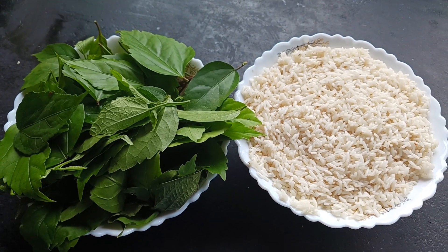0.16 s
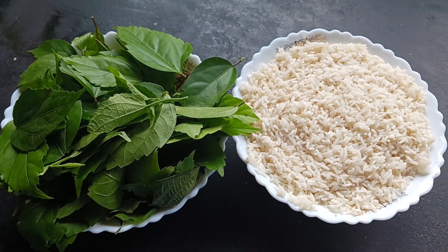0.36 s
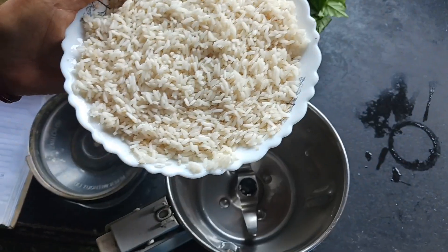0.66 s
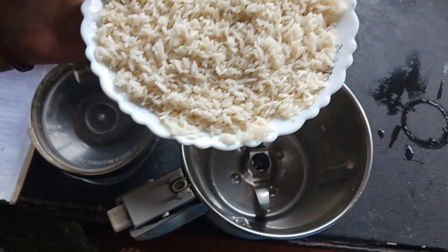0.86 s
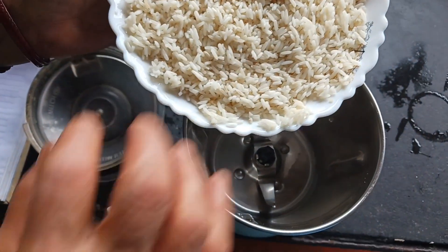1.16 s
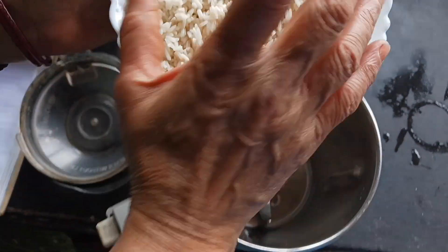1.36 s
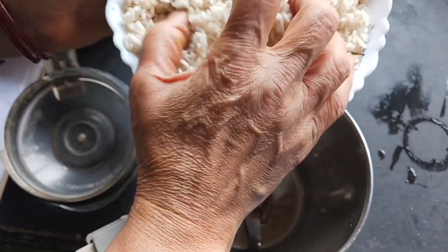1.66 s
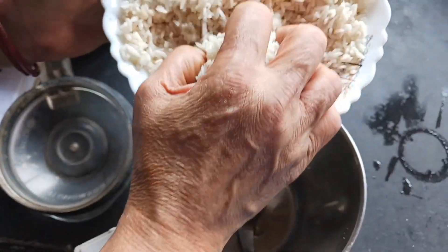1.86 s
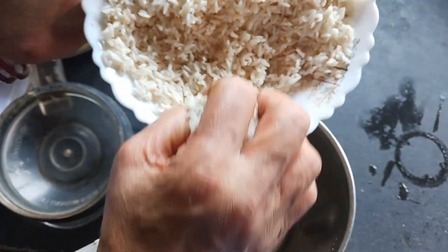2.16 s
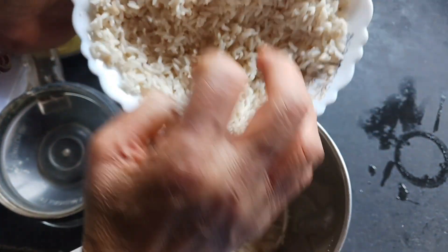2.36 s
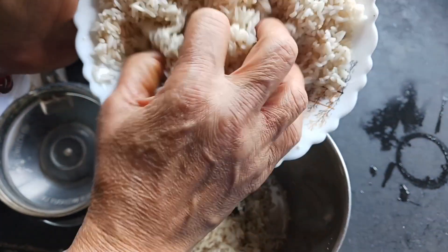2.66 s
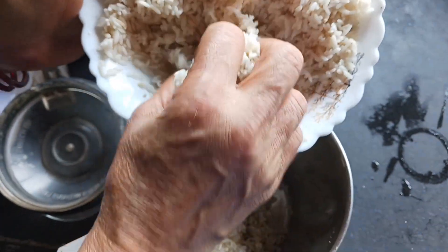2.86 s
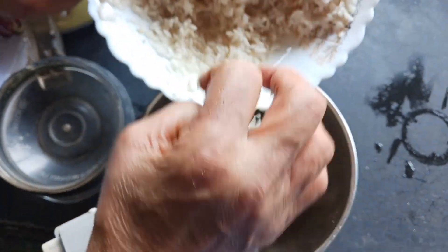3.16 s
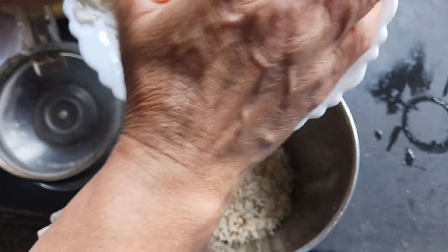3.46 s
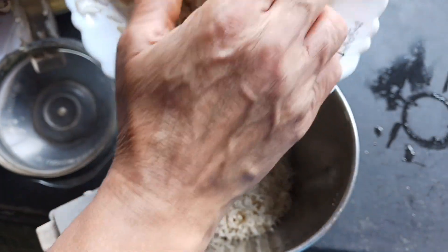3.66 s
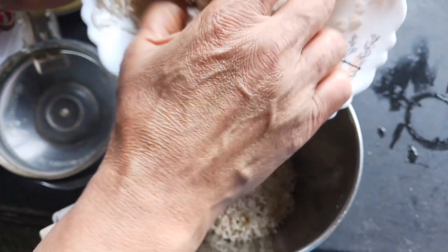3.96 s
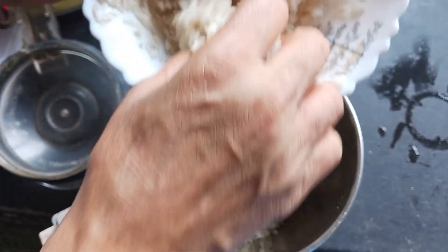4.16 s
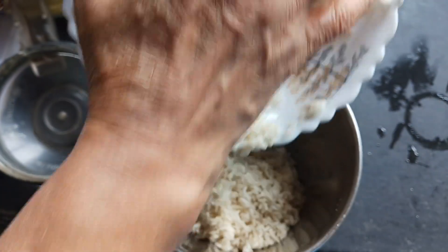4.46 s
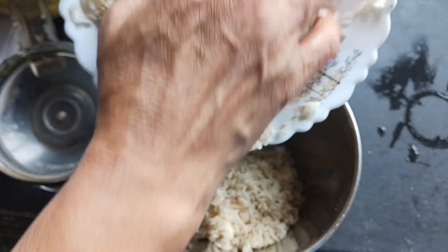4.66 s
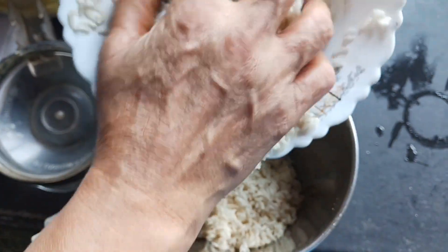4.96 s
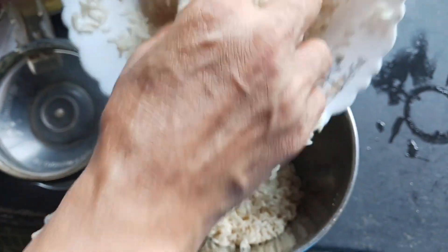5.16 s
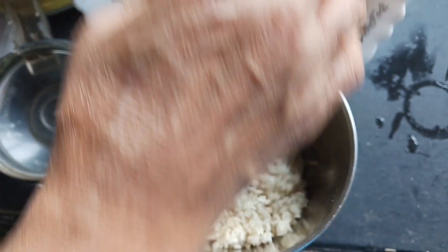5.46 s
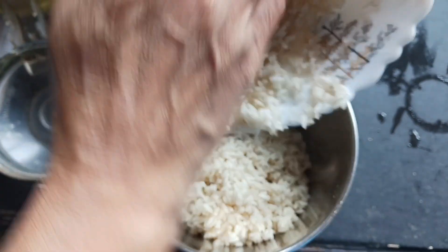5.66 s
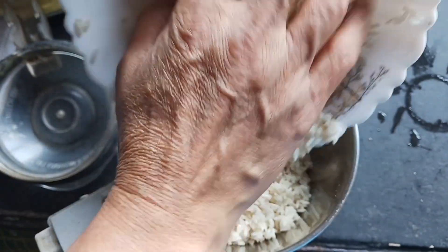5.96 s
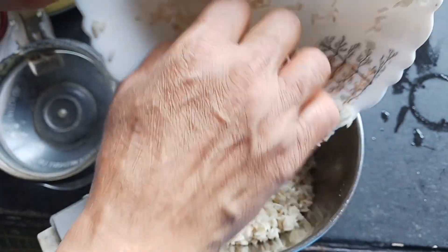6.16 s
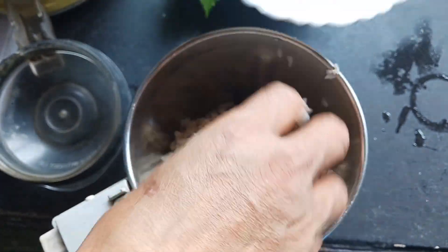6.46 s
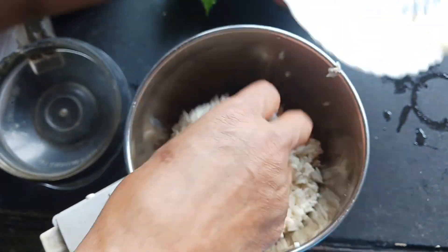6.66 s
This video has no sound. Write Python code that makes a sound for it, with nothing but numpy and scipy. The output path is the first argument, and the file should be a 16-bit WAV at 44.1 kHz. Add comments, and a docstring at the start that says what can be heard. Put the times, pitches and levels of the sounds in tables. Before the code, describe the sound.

A close stereo view of a small, quiet kitchen with a faint steady hush. A lone grain ticks at the start; at 0.5-0.9 s a heap of soaked rice glides on a plate in a smooth swish. A light knock of plate on steel rim comes at 1.6 s. From 2.1 to 2.5 s the first rice spills, crackling wetly, clumps pattering into the hollow jar. A soft knock at 2.6 s, then a brief finger rub and a stronger hissing, slightly whistling spill at 3.1-3.4 s with one loud clump landing. Harder short clanks follow at 3.7, 4.0, 4.6 and 5.1 s, between raking strokes, juddering fingertips and spills near 4.3 and 5.4 s. Tiny high bangle pings appear from 4.6 s. A last rim knock with small rebounds at 6.3 s gives way to soft stirring, ticks and clumps until 6.8 s.

```python
"""Soaked rice is raked by hand off a glass plate into a steel grinder jar, close by in a small kitchen.
Over a steady hush the heap first glides as smooth noise; filtered bursts make single grains tick.
The plate then knocks on the jar's rim, as decaying noise and damped modes, and clumps land as short showers.
Random contacts through filters and resonances make the rice spill into the jar and hiss under the raking hand.
Fingers judder over the plate between strokes, and later bangles ping as close pairs of sines."""
import sys
import numpy as np
from scipy import signal
from scipy.fft import rfft, irfft, next_fast_len
from scipy.io import wavfile

SR = 44100
rng = np.random.default_rng(int(sys.argv[2]) if len(sys.argv) > 2 else 0)


def bounce(signal):
    """Save signal as a 16-bit WAV file at the path given by the first command-line argument."""
    frames = np.transpose(np.atleast_2d(signal))
    limited = np.clip(frames, -1, 1)
    pcm = np.round(limited * 32767).astype(np.int16)
    wavfile.write(sys.argv[1], SR, pcm)


N = 299864
TIME = np.arange(N) / SR   # the whole scene, s
AGE = np.arange(int(.5 * SR)) / SR   # time since the onset of one event, s

# The plate's own note. Each row: frequency in Hz, level in dB, decay t60 in seconds.
PLATE_NOTE = [(1782, 0, .33)]
# Modes that ring after a knock, the lowest from the counter beneath: their frequencies in Hz.
MODE_HZ = [113, 310, 530, 645, 712, 1055, 1320, 1430, 1530, 1670, 2988, 3025, 3255, 3382, 3908, 4095, 4380,
           4763, 5865]
# Likeness of left and right. Each row: frequency in Hz, correlation.
LIKENESS = [(60, 0.79), (600, 0.74), (1200, -0.19), (2500, 0.12), (15000, 0.027)]
# Spectrum of grains sliding in a mass. Each row: frequency in Hz, relative density in dB per Hz.
SLIDE_SPECTRUM = [(100, -25), (450, -27), (1100, -29), (1700, -12.5), (2500, -7), (3400, 0.5), (4800, 0),
                  (6200, 1.5), (7400, -11.5), (10000, -12.5), (16000, -18.5)]
# Spectrum of wet crackle. Each row: frequency in Hz, relative density in dB per Hz.
CRACKLE_SPECTRUM = [(1500, -43.5), (4000, -14), (7500, -2.5), (10000, -4.5), (12500, 6), (14500, -0.5),
                    (16000, -7.5)]
# Spectrum of the dull rasp. Each row: frequency in Hz, relative level in dB.
RASP_SPECTRUM = [(120, -24), (400, -8.5), (580, -22), (950, -3.5), (1200, -4.5), (1600, -7.5), (2300, 4.5),
                 (3200, -6), (6000, -38)]
# Spectrum of clumps and lone grains. Each row: frequency in Hz, relative density in dB per Hz.
CLUMP_SPECTRUM = [(200, -24), (1200, -36), (2000, -39), (2700, -18), (4000, -1.5), (6000, -3.5),
                  (8500, -7.5), (12800, 1), (16000, 2)]


def from_db(db):
    """Level to gain: 20 dB is a factor of ten in amplitude."""
    return 10 ** (np.asarray(db) / 20)


def rms_one(x):
    """Normalisation: the mean square becomes one."""
    return x / np.sqrt(np.mean(x ** 2) + 1e-20)


def at_hz(points, hz):
    """Interpolation along a logarithmic frequency axis."""
    f, value = np.transpose(points)
    return np.interp(np.log(np.maximum(hz, 1)), np.log(np.maximum(f, 1)), value)


def colour(x, spectrum):
    """Linear filtering: the spectrum is multiplied by a smooth gain."""
    n = next_fast_len(x.shape[-1] + 512)
    gain = from_db(at_hz(spectrum, np.fft.rfftfreq(n, 1 / SR)))
    return irfft(rfft(x, n) * gain, n)[..., :x.shape[-1]]


def place(x, balance):
    """Directional radiation: each pitch has its own level difference, left minus right."""
    sides = []
    for channel, sign in zip(x, (1, -1)):
        sides.append(colour(channel, [(hz, sign * db / 2) for hz, db in balance]))
    return np.array(sides)


def noise(spectrum, size):
    """Partial coherence: mid and side noise are weighted to set the left-right correlation; rms 1."""
    n = next_fast_len(size)
    hz = np.fft.rfftfreq(n, 1 / SR)
    mid, side = rfft(rng.standard_normal((2, n))) * from_db(at_hz(spectrum, hz))
    alike = np.clip(at_hz(LIKENESS, hz), -1, 1)
    stereo = np.sqrt(1 + alike) * mid + np.sqrt(1 - alike) * side * [[1], [-1]]
    return rms_one(irfft(stereo, n)[:, :size])


def fade(t60, rise):
    """Damped response: a quick rise, then exponential decay by 60 dB in t60 seconds."""
    return (1 - np.exp(-AGE / rise)) * np.exp(-np.log(1000) * AGE / max(t60, 1e-3))


def add(out, s, sound):
    """Superposition: a sound is mixed in at time s."""
    i = max(round(s * SR), 0)
    out[:, i:i + sound.shape[-1]] += sound[..., :max(N - i, 0)]


def ring(modes):
    """Modal synthesis: one blow on damped modes, each with a left-right phase set by the correlation."""
    out = np.zeros((2, len(AGE)))
    for hz, db, t60 in modes:
        apart = np.arccos(np.clip(at_hz(LIKENESS, hz), -1, 1)) * rng.choice([-1, 1])
        phase = rng.uniform(0, 2 * np.pi) + np.array([[0], [apart]])
        out += from_db(db) * fade(t60, 1 / hz) * np.sin(2 * np.pi * hz * AGE + phase)
    return out


def resonate(x, hz, width):
    """Resonance: a two-pole band-pass with gain 1 near its top and a bandwidth in Hz."""
    r = np.exp(-np.pi * width / SR)
    numerator = np.array([1, 0, -1]) * (1 - r * r) / 2
    return signal.lfilter(numerator, [1, -2 * r * np.cos(2 * np.pi * hz / SR), r * r], x)


def wander(hz):
    """Random fluctuation: noise confined mostly below hz, with a spread of about 1."""
    fluctuation = colour(rng.standard_normal(N), [(hz, 0), (3 * hz, -40), (6 * hz, -90)])
    return np.clip(rms_one(fluctuation), -2.5, 2.5)


def grains(per_s, size_db, count=5):
    """Shot noise: random contacts of uneven size at several spots, each with its own wall reflections."""
    at = np.flatnonzero(rng.random(N) < per_s / SR)
    sizes = from_db(size_db * np.minimum(rng.exponential(1, len(at)), 4)) * rng.choice([-1, 1], len(at))
    clicks = np.zeros((count, N))
    # denser contacts are weaker, so that the mean power does not follow the rate
    clicks[rng.integers(0, count, len(at)), at] = sizes / np.sqrt(np.broadcast_to(per_s, N)[at])
    echo = rfft(rng.standard_normal((count, 2, 512)) * fade(.005, .00003)[:512])
    # a flat magnitude keeps the phases of the reflections but not their colour
    walls = np.roll(irfft(echo / np.abs(echo)), 40, axis=-1)[..., :400]
    spots = [signal.oaconvolve(spot[None], wall, axes=1)[:, :N] for spot, wall in zip(clicks, walls)]
    return rms_one(sum(spots))


def motion(rows, part=None):
    """Power addition: overlapping movements rise, hold and die away; part picks one of a row's shares."""
    t, power = TIME[::32], 0
    for start, rise, hold, t60, db, *shares in rows:
        attack = np.sin(np.pi / 2 * np.clip((t - start) / max(rise, 1e-3), 0, 1)) ** 2
        release = np.exp(-np.log(1000) * np.maximum(t - start - rise - hold, 0) / max(t60, 1e-3))
        level_db = db if part is None else db + shares[part]
        power = power + (from_db(level_db) * attack * release) ** 2
    return np.interp(TIME, t, np.sqrt(power))


def hush():
    """Stationary noise: the kitchen's background has a fixed spectrum and level."""
    # Each row: frequency in Hz, relative density in dB per Hz.
    floor_spectrum = [(15, -41), (25, 2.5), (64, 4.5), (212, -0.5), (384, -7), (1160, -12), (2110, -18.5),
                      (2350, 1.5), (2760, -9.5), (5730, -7.5), (7510, -9), (14000, -5.5), (16000, -25.5)]
    return from_db(-69.5) * noise(floor_spectrum, N)


def gliding():
    """Dense friction: contacts of the shifting heap merge into a smooth hiss over a dull rasp."""
    # The heap glides as the plate is carried and tipped. Each row: start, rise, hold and
    # release t60 in seconds, level in dB, dull rasp in dB relative to that level.
    glides = [(0, 0.0034, 0.014, 1.6, -68.5, -26), (.522, 0.062, 0.11, 0.86, -42.5, -15.5),
              (.77, 0.12, 0.073, 0.33, -46.5, -7), (1.17, .13, 0.039, 2.6, -62, -3.5),
              (1.915, 0.058, 0.079, 2.7, -59.5, -15)]
    wet_db = -16   # crackle relative to the hiss
    hiss = noise(SLIDE_SPECTRUM, N) + from_db(wet_db) * noise(CRACKLE_SPECTRUM, N)
    return motion(glides) * hiss + motion(glides, part=0) * noise(RASP_SPECTRUM, N)


def clumps():
    """Impact duration: a clump lands as a short shower of sticky grains, a lone grain as one tick."""
    # The largest clumps tear off and land. Each row: start in seconds, level in dB, decay t60 in seconds.
    falls = [(2.1, -42, 0.057), (2.267, -32, 0.081), (2.351, -34, 0.075), (2.361, -28.5, 0.099),
             (2.4309, -35, 0.23), (3.2462, -19, 0.079), (4.356, -35, 0.087), (5.372, -37, 0.056),
             (5.5051, -33, 0.054), (6.4963, -33.5, 0.074), (6.7852, -34, .085)]
    # Single grains tick on the steel. Each row: start in seconds, level in dB.
    lone_grains = [(0.082, -43), (1.789, -41), (2.102, -34), (2.352, -33), (5.594, -45), (5.6535, -32.5),
                   (5.968, -38), (6.253, -41), (6.4706, -35), (6.552, -38.5), (6.595, -34.5), (6.745, -36)]
    showers, ticks = np.zeros((1, N)), np.zeros((2, N))
    for s, db, t60 in falls:
        add(showers, s, from_db(db) * fade(t60, 0.0012))
    for s, db in lone_grains:
        add(ticks, s, from_db(db) * noise(CLUMP_SPECTRUM, len(AGE)) * fade(0.022, 0.00021))
    sticky = grains(7000, size_db=2.0, count=3)
    return showers * rms_one(colour(sticky, CLUMP_SPECTRUM)) + ticks


def clatter(t60):
    """High modal density: crowded modes of plate and rim act as decaying noise with a hard front."""
    # Each row: frequency in Hz, relative density in dB per Hz.
    clatter_spectrum = [(47, -50), (80, -32), (277, -35), (601, -4.5), (937, -15.5), (1740, 2.5),
                        (2220, -15.5), (3240, -8.5), (3620, -18.5), (4050, -12.5), (5400, -21), (8410, -32),
                        (13100, -17), (15000, -25.5), (16000, -39)]
    rise = .0004   # s
    envelope = fade(t60, rise) + from_db(-6.0) * fade(0.027, rise)
    return noise(clatter_spectrum, len(AGE)) * envelope


def knocks():
    """Impulsive excitation: a knock clatters, rings plate and jar by the spot struck, and wakes the room."""
    # Plate knocks on the rim. Each row: start in seconds, relative levels of clatter and ring in dB,
    # low and high tilt in dB, relative level of the plate's note in dB, clatter t60 in seconds,
    # and the Hz of three modes that the struck spot favours, strongest first.
    blows = [(1.5761, -22.5, -25.5, 4, -0.5, -28.5, 0.078, 3010, 4380, 4763),
             (2.6412, -28, -26.5, 2.5, 1.5, -35, 0.1, 3033, 4763, 645),
             (3.6976, -18, -19.5, 0.5, 0, -23.5, 0.072, 4080, 4380, 3014),
             (4.0151, -17, -19.5, -2, -1, -33.5, 0.054, 3020, 3255, 4763),
             (4.6288, -16, -20, -4, 0.5, -22.5, 0.056, 3020, 712, 4763),
             (5.093, -14, -18.5, -6.5, 0.2, -35.5, 0.047, 3187, 4095, 3010),
             (6.2722, -20.5, -19, -3, 3.5, -39, 0.062, 1465, 2988, 712)]
    # The plate bounces back on the rim. Each row: start in seconds, relative level in dB.
    rebounds = [(1.586, -25.5), (2.655, -25), (4.027, -23.5), (6.307, -35), (6.314, -27.5)]
    # Damping of the modes, in the order of MODE_HZ. Each row: level in dB before any lift, t60 in seconds.
    mode_decays = [(-19.5, .28), (-31.5, .4), (-22, 0.29), (-13.5, 0.19), (-24.5, 0.31), (-23, 0.25),
                   (-24, 0.26), (-23.5, 0.077), (-35.5, .22), (-22, 0.56), (-27.5, 0.35), (-32, 0.32),
                   (-19, 0.17), (-37, 0.14), (-33, .1), (-21, 0.25), (-26, .25), (-22.5, 0.19),
                   (-37.5, 0.62)]
    # Lift of the three favoured modes in dB.
    favour_db = (14, 10, 7.5)
    # Spectrum of the room's response. Each row: frequency in Hz, relative density in dB per Hz.
    room_spectrum = [(40, -23), (115, -2.5), (220, -19), (380, -9.5), (600, -1.5), (850, -14), (1500, 0.5),
                     (2400, -6), (3200, -7.5), (5500, -18.5), (8000, -30), (12500, -21), (16000, -25.5)]
    out = np.zeros((2, N))
    for s, clatter_db, ring_db, low_db, high_db, note_db, t60, *favoured in blows:
        lift = {}
        for near, db in zip(favoured, favour_db):
            closest = min(MODE_HZ, key=lambda hz: abs(hz - near))
            lift[closest] = db
        modes = [(hz, db + lift.get(hz, 0), decay) for hz, (db, decay) in zip(MODE_HZ, mode_decays)]
        room = from_db(-11.5) * noise(room_spectrum, len(AGE)) * fade(0.39, 0.0016)
        blow = from_db(clatter_db) * clatter(t60)
        blow += from_db(ring_db) * (ring(modes) + room)
        blow += from_db(note_db) * ring(PLATE_NOTE)
        # the struck spot sets the weight of low and high modes; below 200 Hz nothing changes
        tilt = [(200, 0), (520, low_db), (1100, 0.0035), (1800, 0.012), (3200, high_db)]
        add(out, s, colour(blow, tilt))
    for s, db in rebounds:
        add(out, s, from_db(db) * colour(clatter(0.033), [(2000, 0.5), (6000, -35.5)]))
    return out


def flecks(per_s, t60):
    """Sparse excitation: now and then a grain hits bare steel and rings one of its high modes."""
    out = np.zeros((2, N))
    for hz in MODE_HZ[10:]:
        taps = (rng.random(N) < per_s / SR) * rng.uniform(-1.3, 1, (2, N))
        bandwidth = np.log(1000) / np.pi / t60
        out += resonate(taps + 1e-18, hz, bandwidth)   # the offset keeps the filter off denormal numbers
    return rms_one(out)


def rice():
    """Granular excitation: raking hisses, rasps and whistles; spilling crackles and sounds the jar."""
    # Fingers rake through the rice. Each row: start, rise, hold and release t60 in seconds, level in dB,
    # then wet crackle, dull rasp and whistle of the plate in dB relative to that level.
    rakes = [(2.698, 0.096, .28, 0.65, -62, -13.5, -13, -33),
             (3.1, 0.22, 0.11, 0.89, -37.5, -8.5, -24.5, -7),
             (3.885, .105, 0.0073, 0.14, -49, -7.5, -23, -26), (4.084, 0.18, 0.19, 0.86, -54, -7, -13, -10),
             (4.739, 0.034, 0.0043, 0.49, -57, -3, -10, -18),
             (4.965, 0.14, 0.26, 1, -52, -12.5, -12.5, -7.5), (5.56, 0.072, 0.038, .3, -62, -5, -3.5, -25),
             (5.7, .045, 0.0031, 0.23, -45.5, -10.5, -23, -26.5),
             (5.88, 0.22, 0.012, .4, -58, -0.5, -11.5, -35), (6.331, 0.051, .03, 1, -53, -4, -15, -14.5)]
    # Rice spills over the edge into the jar. Each row: start, rise, hold and release t60 in seconds,
    # level in dB, hollow of the jar in dB relative to that level.
    spills = [(2.097, 0.011, .1, 0.52, -51.5, -4), (2.16, 0.14, .12, 0.27, -44, -10),
              (3.083, .03, .012, 0.17, -44.5, -16), (3.14, .11, .015, .4, -38.5, -18),
              (4.24, .1, .1, .3, -48, -13), (4.335, .055, .008, .22, -33.5, -8.5),
              (5.29, .11, 0.083, 0.81, -46, -6), (6.47, 0.037, 0.027, 1, -59, 0)]
    # Resonances of the jar under falling rice. Each row: frequency in Hz, width in Hz, level in dB.
    jar_resonances = [(620, 170, -8.5), (1793, 70, 7.5), (4240, 180, 7), (5890, 200, 0)]
    rake, spill, jar = motion(rakes), motion(spills), motion(spills, part=0)
    sticking, rasp, whistle = [motion(rakes, part) for part in range(3)]

    # sticky rice moves unevenly
    spurts = wander(hz=53.4)
    rake_spurts, spill_spurts = from_db(1.76 * spurts), from_db(2.06 * spurts)
    rake_moving, spill_moving = rake * rake_spurts, spill * spill_spurts

    heap = grains(4000, size_db=1.0)
    spill_hiss_db = -4.5   # relative to the spill
    hiss_level = np.hypot(rake_moving, from_db(spill_hiss_db) * spill_moving)
    hiss = hiss_level * rms_one(colour(heap, SLIDE_SPECTRUM))
    rasping = rasp * rake_spurts * rms_one(colour(heap, RASP_SPECTRUM))
    # rice skating over the plate sings in a narrow band
    whistling = whistle * rms_one(resonate(heap, hz=3380, width=150))

    # grains that strike the jar hard enough to sound it
    landings = grains(270, size_db=3.5, count=3)
    hollow = rms_one(sum(from_db(db) * resonate(landings, hz, width) for hz, width, db in jar_resonances))
    steel = hollow + from_db(-5) * flecks(per_s=12, t60=.05)
    rake_jar_db = -18   # relative to the raking
    jar_sound = np.hypot(from_db(rake_jar_db) * rake, jar * spill_spurts) * steel

    # the crackle rate goes with the root of the wet amplitude, above a small minimum
    wet = np.hypot(spill_moving, sticking * rake_spurts)
    density = np.sqrt(wet / from_db(-56) + 0.014)
    crackle = rms_one(colour(grains(2400 * density, size_db=1.5), CRACKLE_SPECTRUM))
    # loose grains click out of the crackle
    loose = grains(70 * density, size_db=5.5, count=2)
    strays = from_db(-11.5) * rms_one(colour(loose, CLUMP_SPECTRUM))
    crackling = wet * (from_db(1.5) * crackle + strays)
    return hiss + rasping + whistling + jar_sound + crackling


def rubs():
    """Frictional excitation: wet fingertips judder under growing pressure and sound the plate's note."""
    # Fingers drag over the plate. Each row: start and end in seconds, level at the end in dB.
    drags = [(2.947, 3.068, -53.5), (4.122, 4.259, -46.5), (5.149, 5.273, -44.5), (6.28, 6.352, -49.5)]
    # Each row: frequency in Hz, relative density in dB per Hz.
    rub_spectrum = [(200, -21.5), (420, -13.5), (590, 6), (720, -3), (850, -7.5), (1300, -2), (1700, -23),
                    (2400, -26), (5000, -27)]
    pressure = np.zeros(N)
    for start, end, db in drags:
        press = np.interp(TIME, [start, end - .01, end + 0.015], [0, 1, 0])
        pressure += from_db(db) * press ** 1.04
    judder = pressure * noise(rub_spectrum, N) * from_db(2.0 * wander(hz=79.7))
    note = rms_one(resonate(rng.standard_normal((2, N)), PLATE_NOTE[0][0], width=20))
    return judder + from_db(-1) * pressure * note


def bangles():
    """Mode splitting: thin rings touch and ping with a close pair of modes."""
    # Each row: start in seconds, relative level in dB, frequency of the lower mode in Hz.
    touches = [(4.604, -34.5, 10300), (5, -35.5, 10270), (5.302, -28.5, 10100), (5.3207, -32, 10030),
               (6.0364, -24.5, 10320), (6.3728, -29.5, 10360), (6.391, -32, 10370)]
    out = np.zeros((2, N))
    for s, db, hz in touches:
        add(out, s, from_db(db - 10.5) * ring([(hz, 0, .09), (hz + 170, -9, .04)]))
    return out * from_db([[4], [-5]])   # louder on the left


def scene():
    """Superposition: plate, jar, rice and bangles sound over the hush of the kitchen."""
    # Left minus right for plate sounds and for rice. Each row: frequency in Hz, difference in dB.
    plate_balance = [(100, 2), (400, 2), (700, -2.5), (1200, 7), (1780, 4), (2400, -4.5), (3300, -6),
                     (4400, 0), (8000, 0), (15000, -1)]
    rice_balance = [(100, 4.5), (700, 4), (1100, 11), (2400, -1.5), (4400, -4.5), (6000, -3.5), (8000, 7),
                    (15000, -1)]
    grain_sounds = place(gliding() + clumps() + rice(), rice_balance)
    plate_sounds = place(knocks() + rubs(), plate_balance)
    return hush() + grain_sounds + plate_sounds + bangles()


def record(dry):
    """Band limitation: the right microphone has a narrow treble notch; both sides are cut steeply on top."""
    notch_hz, notch_q, cutoff_hz = 8140, 9.5, 15700
    right = signal.lfilter(*signal.iirnotch(notch_hz, notch_q, fs=SR), dry[1])
    low_pass = signal.ellip(10, .3, 70, cutoff_hz, fs=SR, output="sos")
    return signal.sosfilt(low_pass, [dry[0], right])


dry = scene()
out = record(dry)
bounce(out)
```